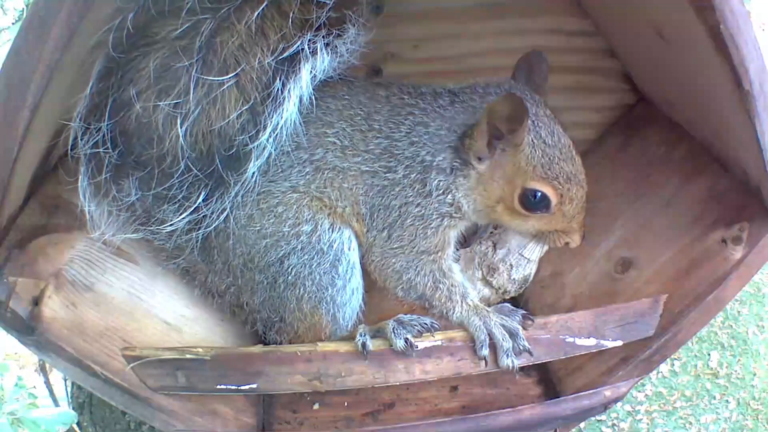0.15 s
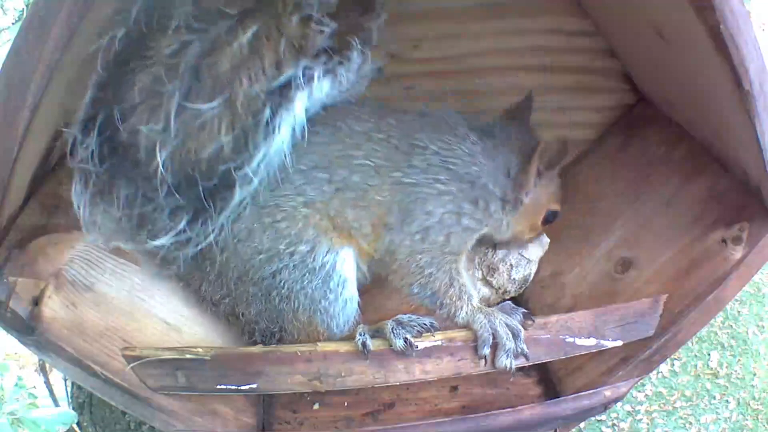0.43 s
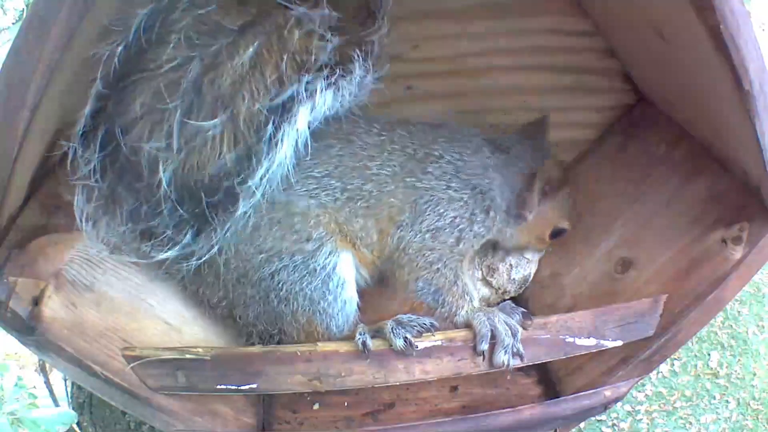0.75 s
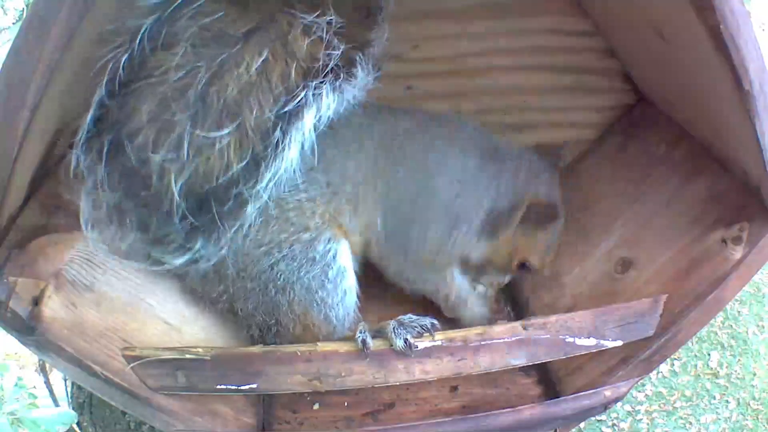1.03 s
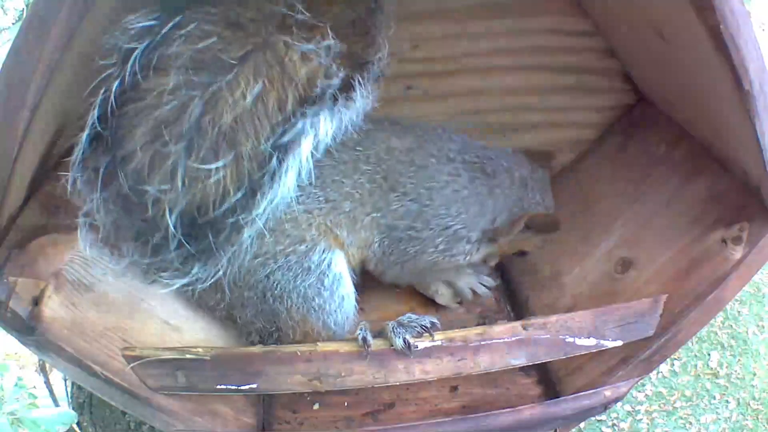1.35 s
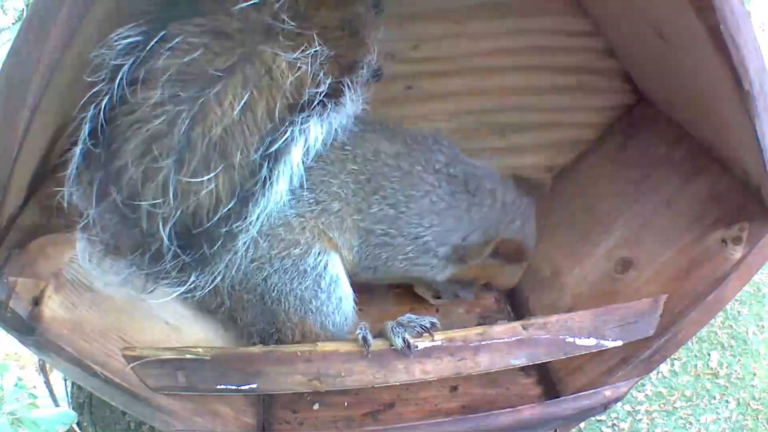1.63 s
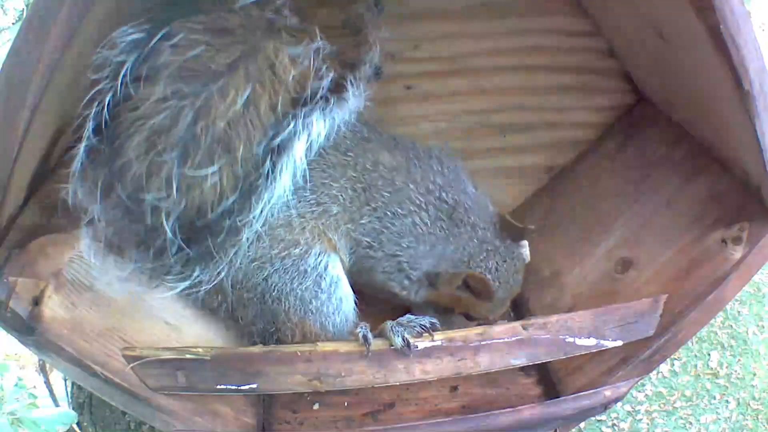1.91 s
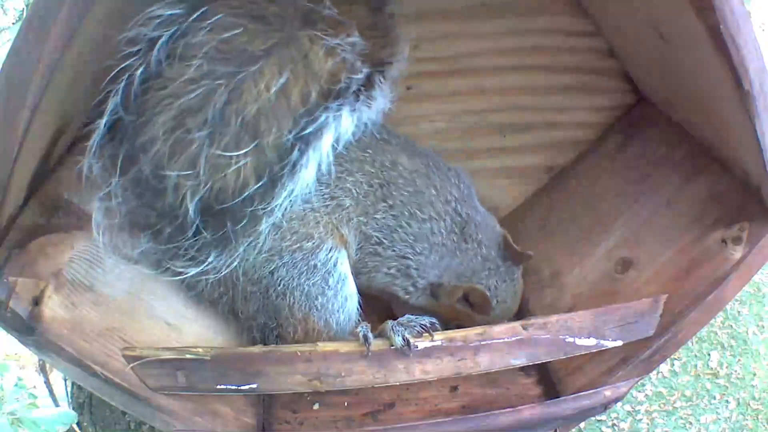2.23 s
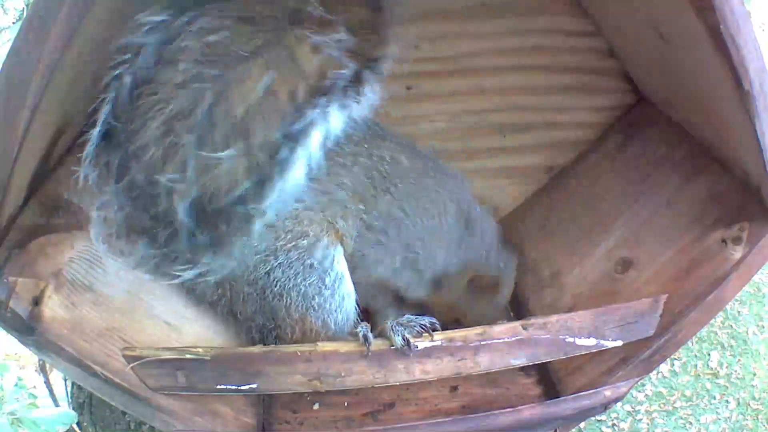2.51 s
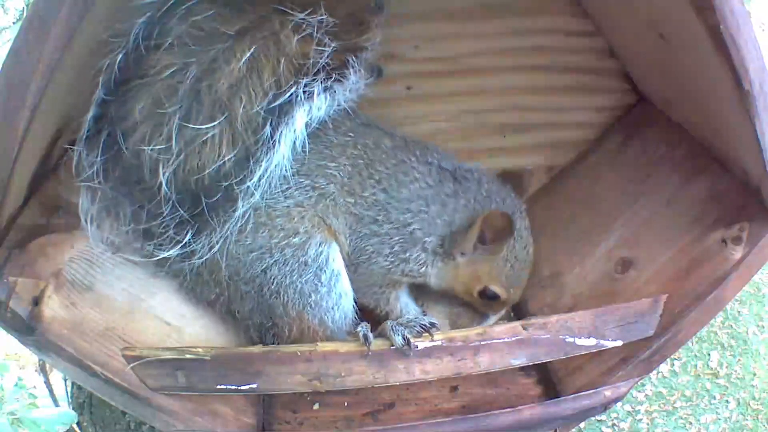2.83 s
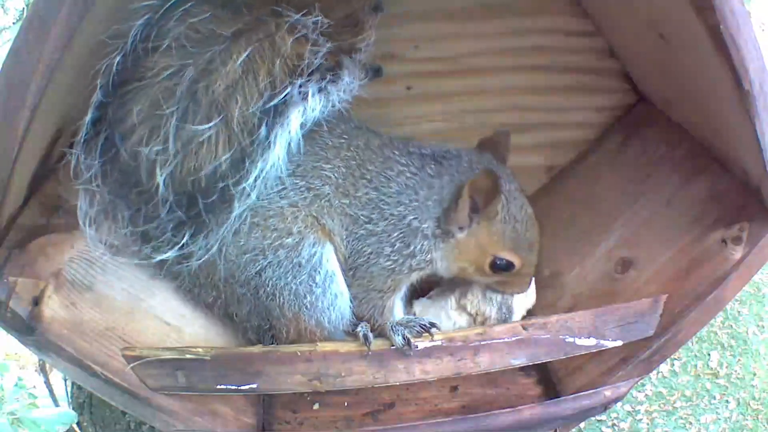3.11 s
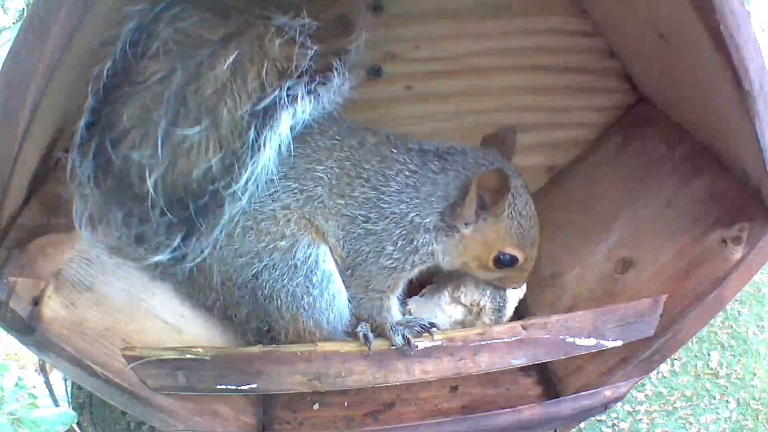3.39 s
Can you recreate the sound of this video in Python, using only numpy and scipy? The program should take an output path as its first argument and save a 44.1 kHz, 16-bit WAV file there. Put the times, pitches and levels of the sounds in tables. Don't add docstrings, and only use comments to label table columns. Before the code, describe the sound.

A squirrel gnaws a bone in a wooden nest box, heard close through the wood. Faint hiss only until 0.25 s; a cracking knock at 0.33, then hollow bumps and paw shuffles, clustered near 0.8 and 1.1. Scraping grows after 1.8, with the strongest crunch at 2.1-2.2 and more to 2.6. A lull, then a heavy thud at 3.1 and bumps to 3.3. Low box rumble, dull muffled treble, faint hum.

```python
import sys
import numpy as np
from scipy import signal
from scipy.fft import rfft, irfft
from scipy.io import wavfile
from scipy.ndimage import uniform_filter1d

SR = 44100
rng = np.random.default_rng(int(sys.argv[2]) if len(sys.argv) > 2 else 0)


def invert_db(x):
    u = np.asarray(x, float) / 20
    return 10 ** u


def master_out(mix):
    frames = np.transpose(np.atleast_2d(mix))
    ceiling = np.clip(frames, -1, 1)
    pcm = np.round(ceiling * 32767).astype(np.int16)
    wavfile.write(sys.argv[1], SR, pcm)


N = 156555

# pitch_hz, level_db, fade_s (time to fall 60 dB)
LOW_MODES = [(120, -8.5, 0.29), (148.23, 6, 0.17), (179, 0.5, 0.097), (231.5, 0, 0.19), (271.4, 4.5, 0.085),
             (328.2, -0.5, 0.1), (409.5, -16.5, 0.047)]
HIGH_MODES = [(487, -4, 0.18), (617.6, 0, 0.056), (782, 2.5, 0.024), (868, 2.5, 0.056), (938, -2.5, 0.079),
              (1032, -5, 0.022), (1166, -10, .06), (1343, -6, 0.017)]
# start_s, shuffle_db, scrape_db
EFFORT = [(0.0, -62, -90), (0.25, -63, -92), (0.44, -47.5, -82), (0.64, -60, -87), (0.85, -41.5, -82),
          (0.99, -57, -64), (1.2, -40, -71), (1.45, -55, -75), (1.72, -49.5, -72.5), (1.9, -41, -61.5),
          (2.06, -54, -68), (2.2, -47.5, -64), (2.45, -41, -62), (2.72, -53, -62), (2.86, -60.5, -74),
          (3.02, -56.5, -59.5), (3.27, -44, -71.5), (3.42, -57.5, -63)]
# start_s, rock_db, mount_db
SWAY = [(0.0, -60, -74), (0.14, -58.5, -73), (0.35, -52, -64), (0.41, -48, -56), (0.64, -61.5, -64),
        (0.89, -43.5, -61), (1.0, -46, -62), (1.25, -44, -50.5), (1.78, -51, -60), (1.91, -46, -63.5),
        (2.08, -58, -72), (2.17, -43, -55), (2.3, -47.5, -57), (2.46, -55.5, -40), (2.51, -44, -48),
        (2.86, -57.5, -62.5), (3.32, -49, -50.5), (3.55, -63, -52.5)]
# start_s, level_db
JOLTS = [(0.243, -55), (0.332, -60), (0.517, -51), (0.832, -41.5), (1.099, -43.5), (1.495, -45),
         (1.783, -45.5), (1.832, -34.5), (2.135, -33), (2.338, -44), (2.595, -50), (2.781, -49),
         (3.242, -36)]
# pitch_hz, level_db (per Hz)
HISS = [(40, 4.5), (300, 3), (1000, 4.5), (2000, 2), (3600, 0.5), (4100, 4), (4550, 8), (5000, -0.5)]
# start_s, level_db
HUM = [
    (0, -73),
    (.5, -66),
    (1.5, -66),
    (2.5, -66.5),
    (2.7, -60),
    (2.92, -59),
    (3.1, -70.5),
    (3.55, -59),
]
# start_s, level_db, brightness (0-1), spread_octaves
LIFT_THUDS = [(0.262, -37.5, 0.43, 0.77), (0.334, -22, 0.58, 0.32), (0.361, -26, 1, 0.87),
              (0.438, -21.5, 0.59, 0.2), (0.466, -34.5, 0.44, 0.54), (0.555, -36, 0.52, 0.58),
              (0.59, -43.5, 0.8, 0.4), (0.712, -26.5, 0.58, 0.14), (0.7935, -22, 0.87, 0.99),
              (0.805, -32.5, 0.94, 0.84), (0.8257, -19.5, 0.6, 1.1), (0.843, -31.5, 0.5, 0.55),
              (0.859, -27.5, 1, 0.6), (0.888, -39, 0.48, 0.68), (1.019, -26, 0, 0.64),
              (1.072, -28, 0.67, 0.64), (1.097, -22, 0.63, 0.31), (1.11, -20, 0.64, 1.1),
              (1.122, -19.5, 0.1, 0.86), (1.177, -24.5, 0.63, 0.7), (1.253, -36, 0.27, 0.35),
              (1.288, -33, 0.4, 0.9), (1.324, -25, 0.63, 0.48), (1.348, -39, 0.3, 0.12),
              (1.426, -35, 0.6, 0.42), (1.488, -19, 0.4, 0.27), (1.574, -33.5, 0, 0.97)]
GNAW_THUDS = [(1.734, -35.5, 0.61, 0.33), (1.782, -28, 0.75, 0.5), (1.791, -24.5, 0.67, 0.49),
              (1.834, -25, 0.6, 0.75), (1.849, -30.5, 0.22, 1.1), (1.869, -37, 0.52, 0.33),
              (1.947, -25, 0.56, 0.41), (2.021, -40, 0.35, 0.32), (2.098, -28, 0.45, 1.1),
              (2.109, -20, 0.93, 1.1), (2.128, -14, 0.9, 1.1), (2.141, -20, 0.87, 0.6),
              (2.1605, -18, 0.5, 1.3), (2.179, -23.5, 0.15, 1.1), (2.235, -36, 0.3, 0.7),
              (2.29, -20.5, 0.52, 0.5), (2.319, -37, 0.65, 0.36), (2.348, -34, 0.6, 0.44),
              (2.383, -17, 0.59, 0.49), (2.4, -17, 0.12, 0.87), (2.436, -18, 0.63, 1.2),
              (2.471, -24.5, 0.34, 0.43), (2.562, -18, 0.66, 1.05), (2.72, -41.5, 0.48, 0.5),
              (3.072, -38.5, 0.71, 0.26), (3.103, -12.5, 0.55, 0.31), (3.235, -26.5, 0.66, 0.47),
              (3.256, -20.5, 0.6, 0.21), (3.276, -23, 0.17, 0.89)]
# start_s, level_db, slip_spacing_ms (mean time over two slips), brightness (0-1)
TICKS = [(0.333, -26, 2.3, 0.2), (0.44, -42.5, 1.8, 0.57), (0.558, -40.5, 4.6, 0),
         (0.792, -35.5, 2.8, 0.02), (0.828, -34.5, 2.8, 0.35), (0.848, -44.5, 2.9, 0.5),
         (0.889, -41, 4.9, 0.26), (1.076, -38.5, 2.6, 0.8), (1.112, -26, 1.53, 0.5),
         (1.328, -37, 2.97, 0.6), (1.784, -26.5, 1.5, 0.93), (1.834, -32.5, 1.46, 0.5),
         (1.946, -45, 5.3, 0.4), (1.972, -42.5, 2.5, 0.6), (2.098, -36, 2.24, 0.4),
         (2.111, -26.5, 1.18, 0.8), (2.13, -21.5, 2.47, 0.8), (2.144, -26.5, 1.2, 1),
         (2.156, -36, 2.7, 0.8), (2.17, -36.5, 1.6, 1), (2.238, -33.5, 5, 1), (2.292, -40, 3.5, 0.74),
         (2.321, -34.5, 4.6, 0.9), (2.349, -39.5, 4, 0.8), (2.416, -36, 4.7, 0.4), (2.436, -34.5, 4.8, 0.4),
         (2.458, -38.5, 3.4, 0.24), (2.551, -31.5, 3.4, 0.56), (2.73, -39, 2.44, 0.9),
         (3.105, -39.5, 1.25, 0.9), (3.218, -35.5, 5.28, 1), (3.25, -33.5, 3.2, 1),
         (0.806, -43.5, 1.3, 0.3), (1.093, -46.5, 1.8, 0.86), (1.126, -35.5, 1.4, 0.76),
         (1.792, -34.5, 1.33, 1), (1.81, -45, 1.4, 0.75), (1.822, -37.5, 2.65, 0.55),
         (1.892, -52.5, 1.5, 0.37), (2.386, -39, 1.8, 0.5), (2.517, -53, 2.4, 0.7), (2.638, -55, 3, 0.7),
         (2.968, -48, 1.85, 0.85), (2.996, -45, 3.6, 0.63), (3.169, -56, 2, 0.6)]
# start_s, level_db, pitch_hz
CRACKS = [
    (0.334, -23.5, 553),
    (0.333, -34.5, 3370),
    (1.109, -39, 1700),
    (1.112, -41, 2400),
    (1.779, -42, 1800),
    (1.791, -39, 1600),
    (1.826, -44, 2100),
    (2.134, -46, 1250),
    (2.558, -39.5, 1700),
    (2.556, -39, 3000),
]

PANEL_HZ, TICK_HZ = (100.7, 370), (427, 1130)
MOUNT_BAND_HZ = (125.7, 331)
ROCK_HZ, MOUNT_HZ = 30.5, 71
CAMERA_HZ, CUT_HZ = 16000, 5030


def level(x, db):
    return x * invert_db(db) / np.sqrt(np.mean(x ** 2))


def bandpass(x, band):
    return signal.sosfilt(signal.butter(2, band, "band", fs=SR, output="sos"), x)


def curve(table, col):
    table = np.array(table)
    return invert_db(np.interp(np.arange(N) / SR, table[:, 0], table[:, col]))


def ring(x, hz, t60):
    pole = np.exp(2j * np.pi * hz / SR - np.log(1000) / (t60 * SR))
    return signal.lfilter([1], [1, -pole], x).imag


def push(x, hz, t60, push_s):
    return ring(ring(x, hz, push_s), hz, t60) * 2 * np.log(1000) / (push_s * SR)


def strike(times, sizes):
    x = np.zeros(N)
    np.add.at(x, np.clip((np.asarray(times) * SR).astype(int), 0, N - 1), sizes)
    return x


def pitch(band, bright):
    return band[0] * (band[1] / band[0]) ** np.clip(bright, 0, 1)


def touch(hz, band, bright, spread):
    octaves_away = np.log2(hz / pitch(band, bright))
    return np.exp(-.5 * (octaves_away / np.clip(spread, .1, 3)) ** 2)


def wobbly(hz, drift, flutter_db):
    slow = [level(uniform_filter1d(uniform_filter1d(v, 3000), 3000), 0) for v in rng.standard_normal((2, N))]
    phase = 2 * np.pi * np.cumsum(hz * (1 + drift * slow[0])) / SR
    return np.sqrt(2) * invert_db(flutter_db * slow[1]) * np.sin(phase)


def grains(rate):
    u = rng.random((3, N))
    happens = u[0] < rate / SR
    size = invert_db(-3 * np.log(u[1] + 1e-9))
    return happens * size * np.sign(u[2] - .5)


def rubbing(modes, rate, col, band):
    def shake(force):
        return sum(invert_db(db) * ring(force, hz, t60) for hz, db, t60 in modes)

    slips = bandpass(grains(rate), band)
    return shake(slips * curve(EFFORT, col)) / np.std(shake(slips))


def sway():
    rumble = level(bandpass(rng.standard_normal(N), [12, 120]), -9)
    rock = (wobbly(ROCK_HZ, .06, 1.5) + rumble) * curve(SWAY, 1)
    mount = wobbly(MOUNT_HZ, 0.027, 2.1) * curve(SWAY, 2)
    t, db = np.array(JOLTS).T
    jolts = push(strike(t, invert_db(db + 1)), MOUNT_HZ, t60=0.58, push_s=0.091)
    return rock + mount + jolts


def starve(hiss):
    hz, t, z = signal.stft(hiss, SR, nperseg=512)
    chance = rng.random((len(hz) // 3 + 1, len(t) // 5 + 1))
    patch = np.kron(chance, np.ones((3, 5)))[:len(hz), :len(t)]
    inside = np.outer((hz > 1900) & (hz < 4100), (t > 2.07) & (t < 2.2))
    hole = inside & (patch < .33)
    return signal.istft(z * ~hole, SR, nperseg=512)[1][:N]


def camera_noise():
    hz, t = np.fft.rfftfreq(N, 1 / SR) + 1, np.arange(N) / SR
    hiss_hz, hiss_db = np.array(HISS).T
    colour = invert_db(np.interp(np.log(hz), np.log(hiss_hz), hiss_db)) * (hz < CUT_HZ)
    hiss = level(irfft(rfft(rng.standard_normal(N)) * colour, N), -56.5)
    hum = wobbly(186, 0.0073, 4.2) * curve(HUM, 1)
    sensor = level(ring(rng.standard_normal(N), 4531, 0.013), -82.5)
    whine = level(np.sin(2 * np.pi * 2099 * t), -86.5)
    return starve(hiss) + hum + sensor + whine


def thuds():
    t, db, bright, spread = np.array(list(LIFT_THUDS) + list(GNAW_THUDS)).T
    t, db = t + 0.00053, db - 10.5
    out = np.zeros(N)
    for hz, mode_db, t60 in LOW_MODES:
        force = invert_db(db + mode_db) * touch(hz, PANEL_HZ, bright, spread)
        out += push(strike(t, force), hz, t60, push_s=0.014)
    age, rise_s = np.arange(2000) / SR, 0.0021
    swell = age / rise_s * np.exp(1 - age / rise_s)
    sizes = invert_db(db + 3) * np.clip(spread, 0, 1)
    for start, size, hz in zip(t, sizes, pitch(PANEL_HZ, bright)):
        knock = size * swell * -np.cos(2 * np.pi * hz * age)
        i = int(start * SR)
        out[i:i + len(age)] += knock[:N - i]
    return bandpass(out, MOUNT_BAND_HZ)


def ticks():
    t, db, ms, bright = np.array(TICKS).T
    chance = rng.random((len(t), 2, 6))
    slip = np.arange(6)
    spacing_s = np.clip(ms, .3, 12)[:, None] / 1000
    when = t[:, None] + spacing_s * slip / 2 * (.5 + chance[:, 0])
    swell = 1.33
    run = (.5 + slip) / swell * np.exp(-slip / swell)
    size = invert_db(db - 7.5)[:, None] * run * np.sign(chance[:, 1] - .5)
    out = np.zeros(N)
    for hz, mode_db, t60 in HIGH_MODES:
        force = size * invert_db(mode_db) * touch(hz, TICK_HZ, bright, 0.76)[:, None]
        out += push(strike(when.ravel(), force.ravel()), hz, t60, push_s=0.0039)
    return bandpass(out, [330, 1400])


def cracks():
    return sum(push(strike([t], invert_db(db)), hz, t60=0.0055, push_s=0.0027) for t, db, hz in CRACKS)


def scene():
    shuffle = rubbing(LOW_MODES, 150, 1, MOUNT_BAND_HZ)
    scrape = rubbing(HIGH_MODES, 700, 2, TICK_HZ)
    box = shuffle + scrape + sway() + thuds() + ticks() + cracks()
    return (box + camera_noise())[None]


def roll_off(x):
    return signal.sosfilt(signal.butter(12, 15620, fs=SR, output="sos"), x)


def record(dry):
    steep = signal.ellip(10, .1, 45, CUT_HZ, fs=SR, output="sos")
    cut = signal.sosfiltfilt(steep, dry[0])
    slow = signal.resample_poly(cut, 160, 441)
    stretched = np.interp(np.arange(N) / SR, np.arange(len(slow)) / CAMERA_HZ, slow)
    rounding = invert_db(-98) * rng.standard_normal(N)
    return roll_off((stretched + rounding)[None])


dry = scene()
out = record(dry)
master_out(out)
```